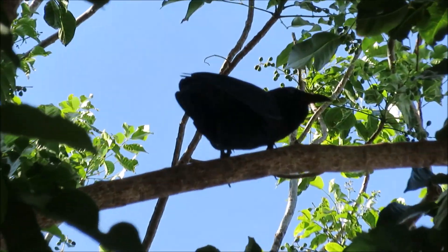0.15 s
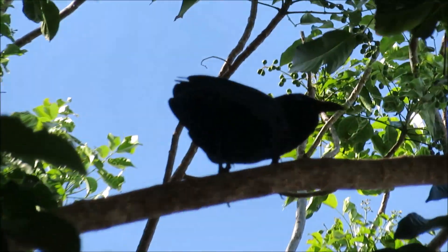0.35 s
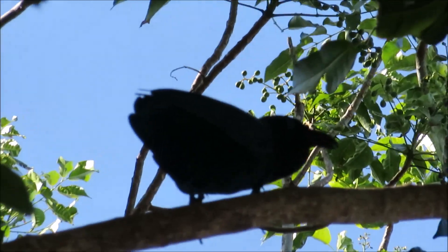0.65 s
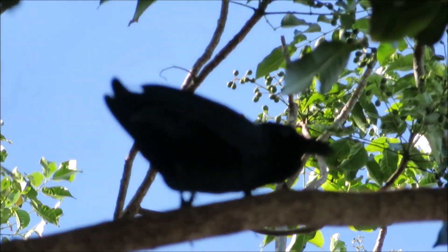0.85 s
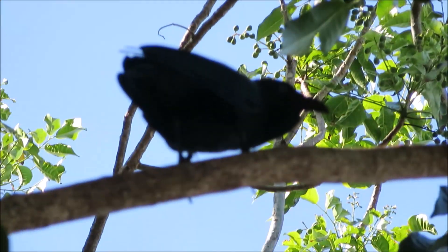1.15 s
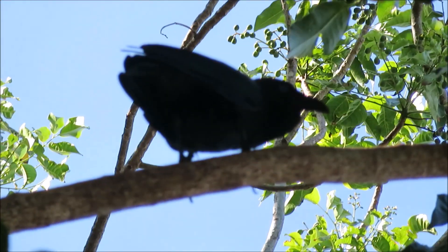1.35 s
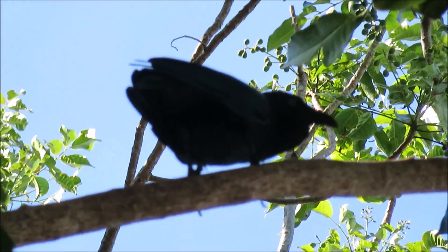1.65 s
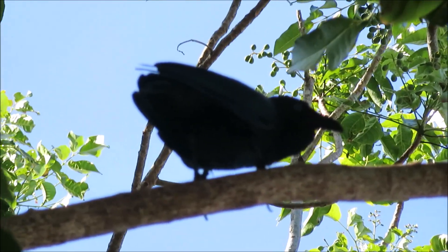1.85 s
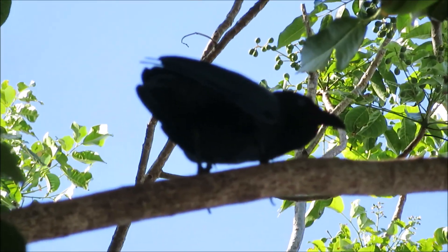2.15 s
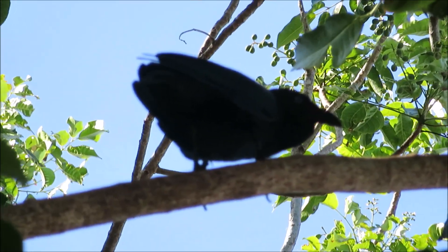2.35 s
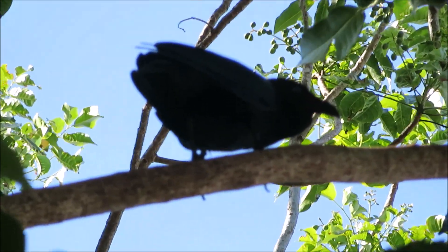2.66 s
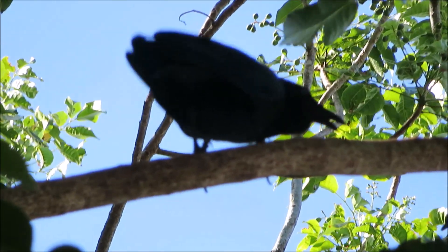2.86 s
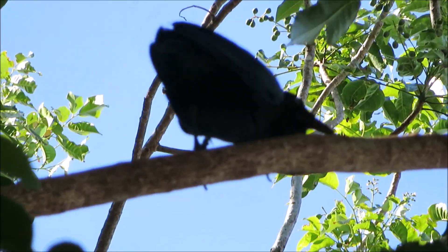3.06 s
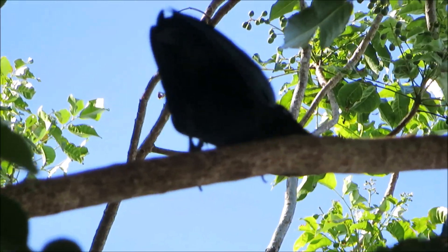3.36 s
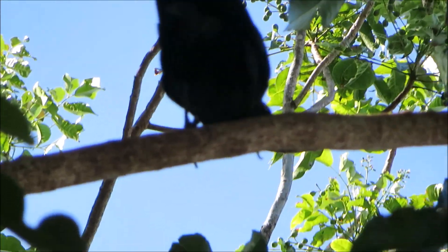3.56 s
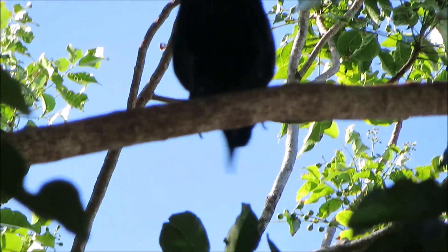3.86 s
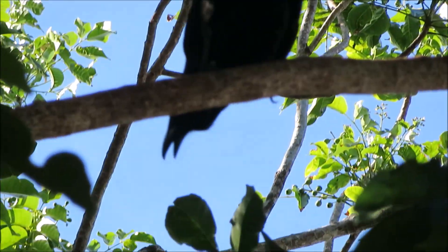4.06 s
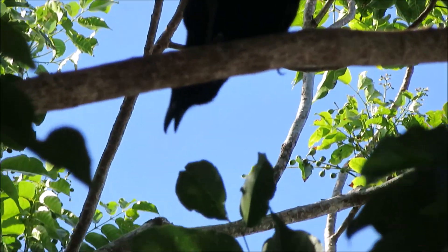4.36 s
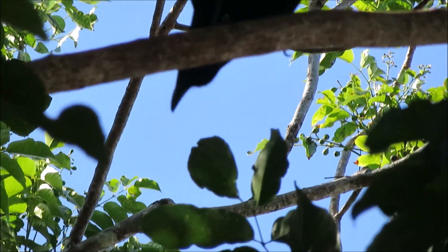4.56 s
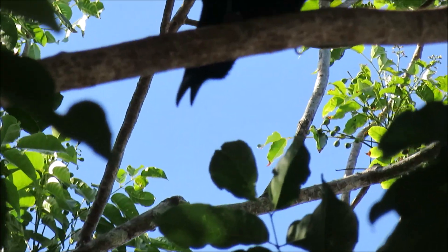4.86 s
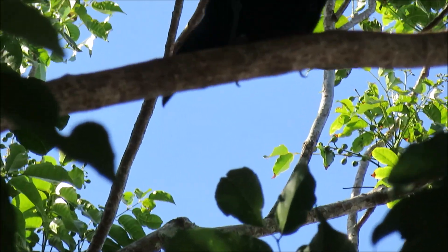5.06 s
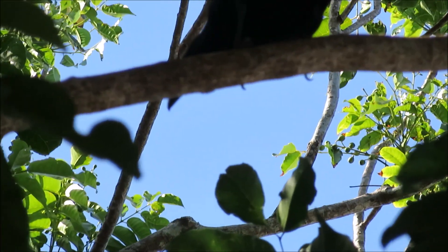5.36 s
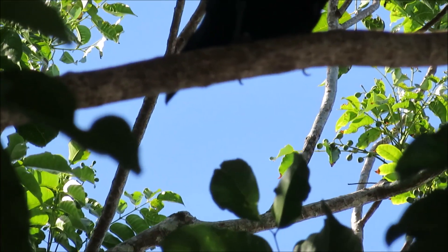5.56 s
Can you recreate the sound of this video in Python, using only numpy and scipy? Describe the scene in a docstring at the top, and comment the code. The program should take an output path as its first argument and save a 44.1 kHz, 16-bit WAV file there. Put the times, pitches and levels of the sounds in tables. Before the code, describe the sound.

Outdoors among trees, far traffic hums and a soft rustle hisses steadily. A crow overhead caws once, and a small bird follows with quick rising whistles. Light wind thumps on the microphone, then the crow delivers a run of five short, raspy caws, with more thin chirps between them. Each call leaves a brief echo, and a faint, distant rasp comes at the end.

```python
"""Among trees, with far traffic, a soft rustle and wind bumping the microphone.
A crow on a branch overhead caws once, then five times. Its voice box sends out quick pulses that
make its windpipe and beak ring; for the last three caws it tips its head down and the throat changes.
A small bird nearby buzzes and whistles rising notes, and a faint, distant rasp comes at the end.
All the calls echo briefly off the branches and for longer among the trees."""
import sys
import numpy as np
from scipy import signal
from scipy.io import wavfile
from scipy.ndimage import uniform_filter1d

SR = 44100
rng = np.random.default_rng(int(sys.argv[2]) if len(sys.argv) > 2 else 0)


def output_pcm(signal):
    """Save a mono or channel-first signal as 16-bit PCM at the path in sys.argv[1].

    Samples are clipped to [-1, 1] before scaling.
    """
    pcm = np.clip(np.atleast_2d(signal).T, -1, 1) * 32767
    wavfile.write(sys.argv[1], SR, np.round(pcm).astype(np.int16))


N = 251370


def gain_of(db):
    """Turns decibels into a number to multiply by."""
    return 10 ** (np.asarray(db) / 20)


def evened(x):
    """Scales a signal to an average size (rms) of 1."""
    return x / np.sqrt(np.mean(x ** 2) + 1e-20)


def at_pitch(points, hz):
    """Looks up a value between a table's frequencies, spaced as the ear hears them."""
    f, value = np.transpose(points)
    return np.interp(np.log(hz + 1), np.log(f + 1), value)


def over_time(points):
    """Joins (time, value) points with straight lines across the whole scene."""
    return np.interp(np.arange(N) / SR, *np.transpose(points))


def add(mix, s, sound):
    """Mixes a sound in at second s."""
    part = mix[round(s * SR):][:len(sound)]
    part += sound[:len(part)]


def resonate(x, hz, width):
    """Makes x ring near hz, like air in a tube; a smaller width rings longer."""
    turn = np.exp(2j * np.pi * np.cumsum(hz * np.ones(len(x))) / SR)
    r = np.exp(-np.pi * abs(width) / SR)
    return 2 * (turn * signal.lfilter([1 - r], [1, -r], x / turn + 1e-18)).real


def wobble(length, span):
    """A smooth random wiggle that changes over about span samples."""
    return evened(uniform_filter1d(uniform_filter1d(rng.standard_normal(length), span), span))


def arch(length, rise):
    """A note's time, the part of its rise still to come (1 to 0) and of its fall done (0 to 1)."""
    t = np.arange(round(length * SR)) / SR
    return t, np.clip(1 - t / rise, 0, 1), np.clip((t - rise) / (length - rise), 0, 1)


def noise(spectrum, alike, patchy_db):
    """Stereo noise of a given tone colour, with drifting louder and softer patches."""
    frames, hz = N // 256 + 5, np.fft.rfftfreq(1024, 1 / SR)
    a, b, c, d, patches = rng.standard_normal((frames, 513, 5)).T
    patches = evened(uniform_filter1d(uniform_filter1d(patches, size=10, axis=0), size=16, axis=1))
    same = np.clip(at_pitch(alike, hz), -1, 1)[:, None]
    left = a + 1j * b
    right = same * left + np.sqrt(1 - same ** 2) * (c + 1j * d)
    bands = np.array([left, right]) * gain_of(at_pitch(spectrum, hz)[:, None] + patchy_db * patches)
    return evened(signal.istft(bands, nperseg=1024, noverlap=768)[1][:, :N])


TRAFFIC_COLOUR = [(12, -27), (20, -48), (83, -2), (171, 1), (259, -4), (439, -7.5), (478, -4.5), (534, -19),
                  (1920, -22), (2400, -23.5), (2610, -24.5), (4310, -27), (10800, -38.5), (12400, -42),
                  (15500, -45)]  # tone colour of the rumble: f/Hz, relative level/dB
TRAFFIC_ALIKE = [(60, 1), (150, 1), (380, 0.77), (950, -0.15), (2380, -0.38), (5980, -0.3), (15000, -0.58)]  # how alike left and right are: f/Hz, likeness (1 = the same)
TRAFFIC_LEVEL = [(0, -44), (1.6, -43.5), (2.6, -46), (5.7, -45.5)]  # how loud the road is: t/s, level/dB


def traffic():
    """Far cars blend into one low, nearly steady rumble."""
    return gain_of(over_time(TRAFFIC_LEVEL)) * noise(TRAFFIC_COLOUR, TRAFFIC_ALIKE, patchy_db=0.46)


RUSTLE_COLOUR = [(290, -34), (500, -7), (577, -1.5), (901, -4.5), (1250, -6.5), (4980, -20.5), (6640, -22),
                 (15500, -38)]  # tone colour of the rustle: f/Hz, relative level/dB
RUSTLE_ALIKE = [(60, 0.87), (150, 1), (380, 1), (950, 0.86), (2380, 0.92), (5980, 0.74), (15000, 0.054)]  # how alike left and right are: f/Hz, likeness (1 = the same)
RUSTLE_LEVEL = [(0, -61.5), (.86, -66), (1, -51), (1.4, -51), (1.9, -51.5), (3.1, -50.5), (5.1, -49),
                (5.7, -51.5)]  # how loud the rustle is: t/s, level/dB


def rustle():
    """A soft rustling hiss, faint at first, stepping up at about one second."""
    return gain_of(over_time(RUSTLE_LEVEL)) * noise(RUSTLE_COLOUR, RUSTLE_ALIKE, patchy_db=2.0)


WIND_LEVEL = [(0, -48.5), (1.2, -57.5), (4, -56.5), (5.7, -53)]  # the rumble between gusts: t/s, level/dB
# One gust a row: t/s, thump level/dB, f/Hz, thump rise/s, swell level/dB
WIND_GUSTS = [(1.337, -38.5, 46.4, 0.017, -48), (1.493, -45, 50, 0.018, -52),
              (1.894, -40.5, 43, 0.026, -58), (2.254, -41, 39.8, 0.011, -48),
              (2.303, -42, 73.6, 0.023, -47), (2.403, -29.5, 52.6, 0.013, -40),
              (2.681, -36, 86.5, 0.022, -30), (2.727, -51, 59.2, 0.022, -40),
              (2.888, -56, 50.4, 0.013, -40.5), (3.052, -37, 40, 0.021, -37),
              (3.324, -35, 45.6, 0.014, -42), (3.496, -37.5, 59.2, .03, -42), (3.92, -47, 50, 0.019, -45),
              (5.4, -38.5, 32, 0.016, -51.5)]
GATHER_S, EASE_S = 0.025, 0.026  # how fast a swell comes and goes


def wind():
    """Air rumbles on the microphone, swelling around each gust and thumping as it hits."""
    band = signal.butter(3, [32, 95], "band", fs=SR, output="sos")
    rumble, eddies = evened(signal.sosfilt(band, rng.standard_normal((2, N))))
    strength = gain_of(over_time(WIND_LEVEL) + 2.5 * wobble(N, 3000))
    thumps = np.zeros(N)
    for s, peak_db, hz, rise, swell_db in WIND_GUSTS:
        since = np.arange(N) / SR - s - 2 * rise
        strength += gain_of(swell_db) * np.exp(np.minimum(since / GATHER_S, -since / EASE_S))
        t = np.arange(round(4 * rise * SR)) / SR
        add(thumps, s, gain_of(peak_db) * t / rise * np.exp(1 - t / rise) * np.sin(2 * np.pi * hz * t))
    sides = gain_of(-15.5) * eddies * np.array([[1], [-1]])  # the same swirls of air push the two sides in opposite directions
    return thumps + strength * (rumble + sides)


# One caw a row: t/s, length/s, rise/s, effort/dB, top pitch/Hz, closing pitch/Hz, first ring/Hz,
# second ring/Hz, beak ring/Hz, extra brightness at the start/dB, then four parts compared with the
# first ring: second ring/dB, middle/dB, treble/dB, low tones/dB
CROW_CAWS = [(0.813, .19, 0.13, -26, 206.8, 185.1, 1330, 1970, 4220, -9.5, 0, -9, -14, -18),
             (2.952, 0.18, .11, -25, 216.5, 186.6, 1292, 2008, 4250, 2, -3.5, -11.5, -15, -22.5),
             (3.508, 0.18, 0.1, -25, 218.1, 202, 1324, 2050, 4430, -2, -3.5, -11, -17.5, -21),
             (4.071, 0.18, .11, -24.5, 217.8, 197.7, 1190, 1736, 3390, 3.5, -1.5, -10, -16, -19),
             (4.475, 0.19, .1, -23, 227.8, 214.4, 1209, 1680, 3250, -2.5, -2, -12, -15.5, -20.5),
             (4.9, 0.18, .11, -23.5, 225.2, 204, 1208, 1671, 3325, 0.5, -1, -9.5, -14, -20)]
BRIGHT_START = (0.81, 0.68, 1.7, -0.26)  # for those four parts: share of the extra brightness
END_CHANGE_DB = (8, -7.5, -0.5, -8)  # for those four parts: change by the end/dB
# Higher rings of windpipe and beak, head level or down; three middle rows, then treble:
# f/Hz, width/Hz, level/dB
RINGS_LEVEL = [(4285, 290, -18.5), (2450, 950, -31), (3885, 190, -22), (5380, 500, -24), (7390, 420, -23.5),
               (8070, 470, -37), (8870, 690, -31.5), (10440, 600, -40.5), (13100, 2300, -51)]
RINGS_DOWN = [(3540, 150, -10.5), (2450, 500, -22), (3800, 1520, -21), (5750, 460, -16), (6150, 690, -17),
              (8160, 190, -22), (8770, 400, -27), (11100, 1700, -38), (12200, 960, -38.5)]
RING_WIDTHS = {"level": (140, 220), "down": (200, 200)}  # for each head pose: first width/Hz, second width/Hz
# A shut beak lowers the rings. For each pose, at start and end: share of first, second, beak pitch
BEAK_SHUT = {"level": ((.79, 0.91, 0.897), (.91, 0.86, 0.873)), "down": ((.88, .95, .96), (.93, .94, 0.96))}
HEAD_TIPS_S, OPENING_HZ = 3.9, 146.07  # when the head goes down; pitch each caw starts on
ROUGH_START, ROUGH_HELD = .08, {"level": .19, "down": .24}  # share of breath noise in the voice


def caw(s, length, rise, top_db, top_hz, closing_hz, first_hz, second_hz, beak_hz, bright_db, *mix_db):
    """Sharp, uneven pulses from the crow's voice box make its windpipe and beak ring."""
    t, early, late = arch(length, rise)
    pose = "level" if s < HEAD_TIPS_S else "down"
    sag = np.sin(np.pi / 2 * early) ** 1.9  # the pitches start low and climb
    hz = top_hz - (top_hz - OPENING_HZ) * sag - (top_hz - closing_hz) * late ** 2
    effort_db = top_db - 22 * early ** 2.53 - 7.5 * late ** 2.03
    first_hz, second_hz, beak_hz = (
        f * (1 - (1 - start) * sag - (1 - end) * late)
        for f, start, end in zip((first_hz, second_hz, beak_hz), *BEAK_SHUT[pose]))
    second_db, middle_db, treble_db, low_db = (
        db + share * bright_db * early ** 3.1 + change * late ** 2
        for db, share, change in zip(mix_db, BRIGHT_START, END_CHANGE_DB))

    rough = ROUGH_HELD[pose] - (ROUGH_HELD[pose] - ROUGH_START) * early ** 4
    rough += .25 * (t / length) ** 4  # the voice breaks up as it ends
    turns = np.cumsum(hz * (1 + .07 * rough * wobble(len(t), 150))) / SR  # counts the pulses
    size = gain_of(5 * rough * rng.standard_normal(80)[turns.astype(int)])
    harmonic = np.arange(1, 100)[:, None]
    pulses = size * np.sum(np.cos(2 * np.pi * harmonic * turns) * (harmonic * hz < 15000), 0)
    puffs = size * (0.18 + np.exp(-(turns % 1))) * rng.standard_normal(len(t))
    raspy = (1 - rough) * evened(pulses) + rough * evened(puffs)
    cleaner = (1 - .5 * rough) * evened(pulses) + .5 * rough * evened(puffs)

    shut = np.clip(1 - t / .09, 0, 1)  # the beak opens early on; while shut the throat rings longer
    throat = []
    for f, width in zip((first_hz, second_hz), RING_WIDTHS[pose]):
        closed, opened = evened(resonate(raspy, f, .5 * width)), evened(resonate(raspy, f, width))
        throat.append(evened(resonate(shut * closed + (1 - shut) * opened, f, 526)))
    first, second = throat
    low_tones = evened(resonate(resonate(pulses, 780, 1200), 600, 950))  # no breath noise here

    rings = RINGS_LEVEL if pose == "level" else RINGS_DOWN
    beak_shift = beak_hz / rings[0][0]
    upper = []
    for n, (f, width, db) in enumerate(rings):
        ring_hz = f * (beak_shift if n < 3 else beak_shift ** .4)  # treble follows the beak less
        ring = resonate(resonate(cleaner, ring_hz, width), ring_hz, 2 * width)
        upper.append((-1) ** n * gain_of(db) * ring)
    middle, treble = evened(sum(upper[:3])), evened(sum(upper[3:]))
    join = np.clip(t / 0.013, 0, 1) ** 3  # middle and treble come in a moment late
    voice = first - gain_of(second_db) * second - gain_of(low_db) * low_tones
    voice += join * (gain_of(middle_db) * middle + gain_of(treble_db) * treble)
    return s, gain_of(effort_db) * voice * signal.windows.tukey(len(t), .1)


# Hoarse bird notes; the last is a faint, distant rasp: t/s, length/s, f/Hz, width/Hz, level/dB
BIRD_BUZZES = [(1.105, 0.085, 4700, 440, -54), (2.755, 0.096, 4750, 2600, -53),
               (2.765, 0.41, 12600, 12000, -72.5), (1.15, .3, 14000, 4000, -80),
               (2.834, 0.036, 6100, 250, -54), (2.88, 0.035, 6700, 400, -64),
               (1.362, 0.084, 2480, 500, -55), (4.724, 0.078, 4730, 660, -51),
               (5.556, 0.24, 3100, 640, -59)]


def buzz(s, length, hz, width, level_db):
    """A hoarse bird note: hiss narrowed around one pitch."""
    hiss = rng.standard_normal(round(length * SR))
    for _ in range(3):
        hiss = resonate(hiss, hz, width)
    return s, gain_of(level_db) * evened(hiss) * signal.windows.tukey(len(hiss), .2)


# The small bird's clear notes: t/s, length/s, first f/Hz, last f/Hz, peak level/dB,
# place of the peak (0-1), start compared with peak/dB, slowing of the slide (0 = steady)
BIRD_WHISTLES = [(1.18, .042, 5050, 5960, -54, .5, -12, 0), (1.207, 0.097, 3610, 5320, -42.5, 0.36, -19, 0),
                 (1.306, .195, 2768, 4712, -40.5, 0.89, -14, 0), (2.853, 0.034, 3950, 4350, -48, .7, -7, 0),
                 (2.893, 0.067, 4400, 4956, -40, 0.38, -11, -.1),
                 (4.816, 0.033, 5280, 5440, -46, 0.84, -10, .05),
                 (4.864, .082, 3970, 4780, -39.5, 0.85, -13, .3),
                 (5.056, 0.094, 3510, 4370, -39, 0.48, -10, .5)]


def whistle(s, length, first_hz, last_hz, peak_db, place, start_db, slowing):
    """The small bird slides an almost pure tone upward, with a slight flutter."""
    t, early, late = arch(length, np.clip(place, .05, .95) * length)
    hz = first_hz + (last_hz - first_hz) * (t / length + slowing * np.sin(np.pi * t / length) / np.pi)
    phase = 2 * np.pi * np.cumsum(hz * (1 + 0.0077 * wobble(len(t), 60))) / SR
    tone = np.sin(phase) + gain_of(-34) * np.sin(2 * phase) + gain_of(-42) * np.sin(3 * phase)
    flutter_db = 2.5 * wobble(len(t), 120)
    level_db = peak_db + start_db * early - 12 * late + flutter_db
    return s, np.sqrt(2) * gain_of(level_db) * tone * signal.windows.tukey(len(t), .15)


# How long echoes of near branches and farther trees take to fade by 60 dB: f/Hz, fade time/s
BRANCH_FADE = [(400, .1), (1500, .13), (8000, .13)]
TREE_FADE = [(400, 0.3), (1200, 1.075), (2800, 0.84), (7000, 1.05), (14000, 0.61)]
BRANCH_COLOUR = [(500, 9), (1500, -1), (4000, -1.5), (9000, 0)]  # tone colour of the branch echoes: f/Hz, level/dB
ECHO_SPREAD = [(60, .15), (500, 0.017), (1500, 0.052), (4000, 0.16), (9000, 0.59)]  # how wide the echoes sound: f/Hz, share that differs left to right


def echoes(x, fade, start_s, colour=((100, 0), (9000, 0))):
    """Sound bounces back as many tiny copies, each pitch range fading at its own speed."""
    bounces = np.zeros((2, SR))
    arrivals = np.arange(0, SR - 20, 20) + rng.integers(0, 20, (2, (SR - 1) // 20))
    np.put_along_axis(bounces, arrivals, rng.choice([-1., 1.], arrivals.shape), 1)
    bounces *= np.arange(SR) > start_s * SR
    hz, t, bands = signal.stft(bounces, SR, nperseg=256)
    centre, side = bands * gain_of(-60 * t / at_pitch(fade, hz)[:, None])
    energy = np.sum(signal.istft(centre, SR, nperseg=256)[1] ** 2)
    side *= at_pitch(ECHO_SPREAD, hz)[:, None]
    stereo = np.array([centre + side, centre - side]) * gain_of(at_pitch(colour, hz))[:, None]
    tail = signal.istft(stereo, SR, nperseg=256)[1] / np.sqrt(energy)
    return signal.fftconvolve(x[None], tail, axes=1)[:, :N]


def scene():
    """All the birds share the same echoes, over traffic, rustle and wind."""
    crow, others = np.zeros(N), np.zeros(N)
    for row in CROW_CAWS:
        add(crow, *caw(*row))
    for row in BIRD_WHISTLES:
        add(others, *whistle(*row))
    for row in BIRD_BUZZES:
        add(others, *buzz(*row))
    calls = crow + gain_of(1.0) * others
    branches = echoes(calls, BRANCH_FADE, start_s=0.0043, colour=BRANCH_COLOUR)
    trees = gain_of(-9.0) * echoes(calls, TREE_FADE, start_s=0.045)
    direct = gain_of(-1.5) * crow + others * gain_of([[.4], [-.4]])  # others a touch to the left
    return direct + branches + trees + rustle() + traffic() + wind()


def record(dry):
    """Cuts the very highest treble, above 15680 Hz."""
    treble_cut = signal.firwin(511, 15680, window=("kaiser", 9), fs=SR)
    return signal.oaconvolve(dry, treble_cut[None], "same")


dry = scene()
out = record(dry)
output_pcm(out)
```